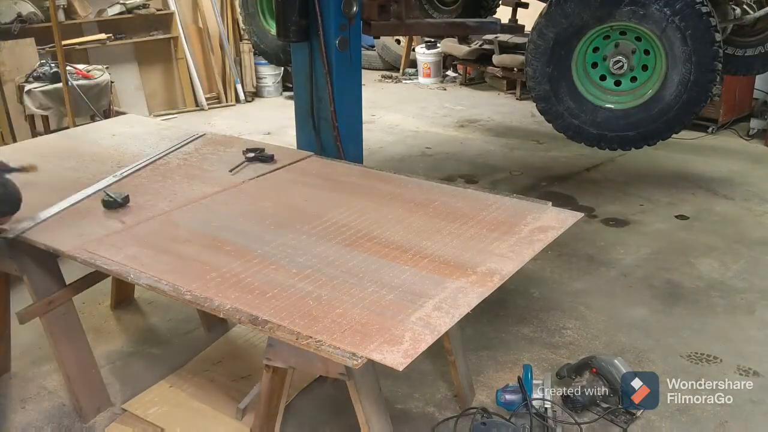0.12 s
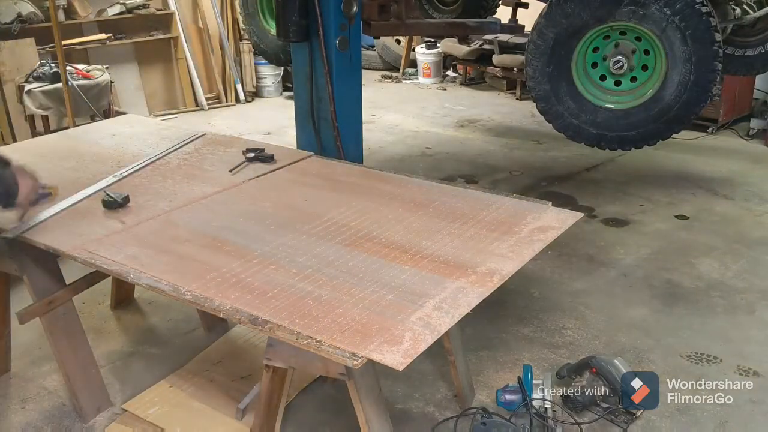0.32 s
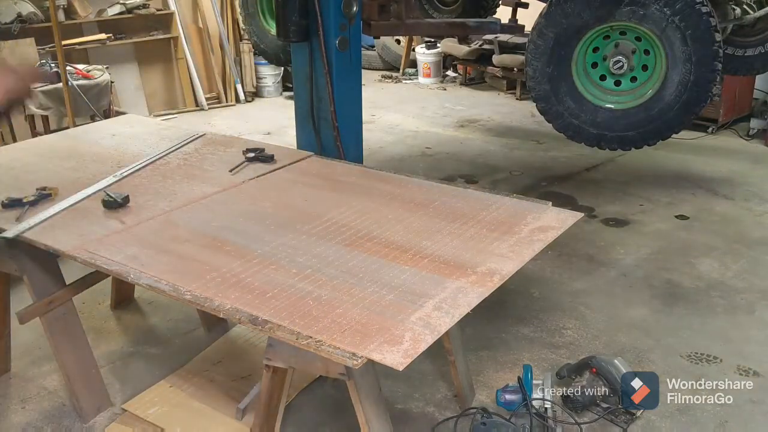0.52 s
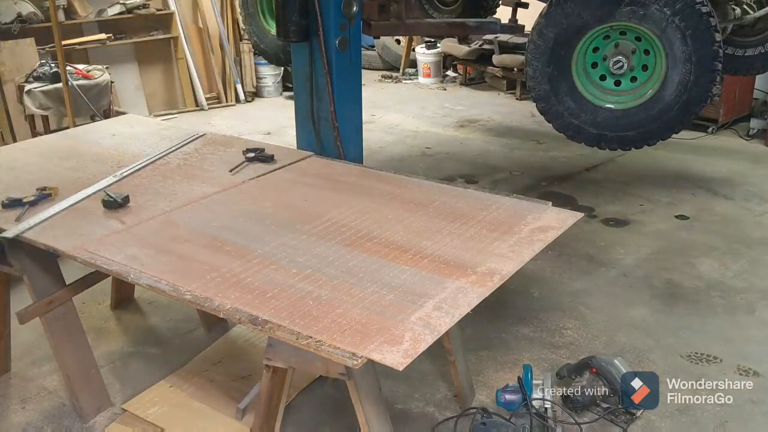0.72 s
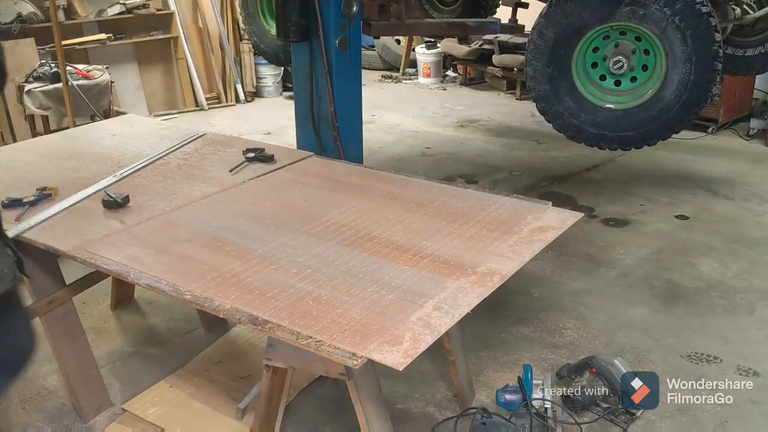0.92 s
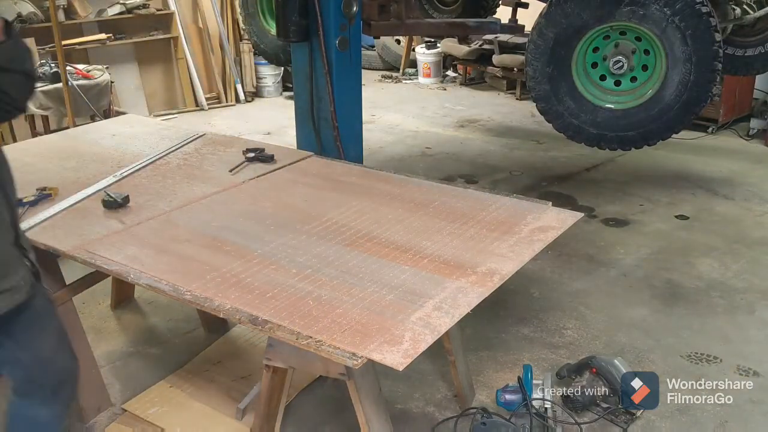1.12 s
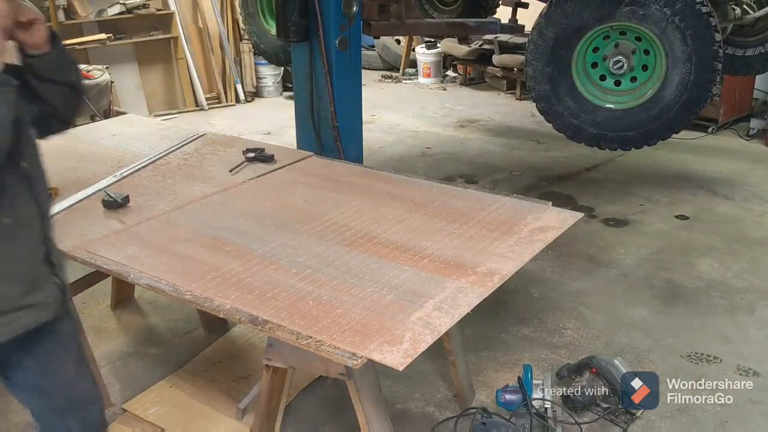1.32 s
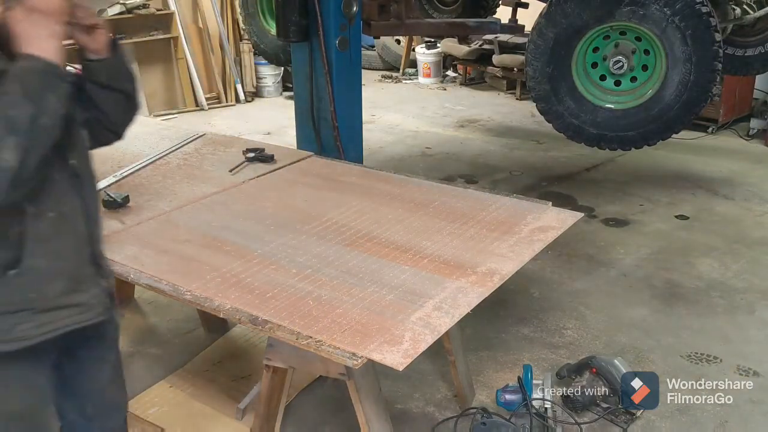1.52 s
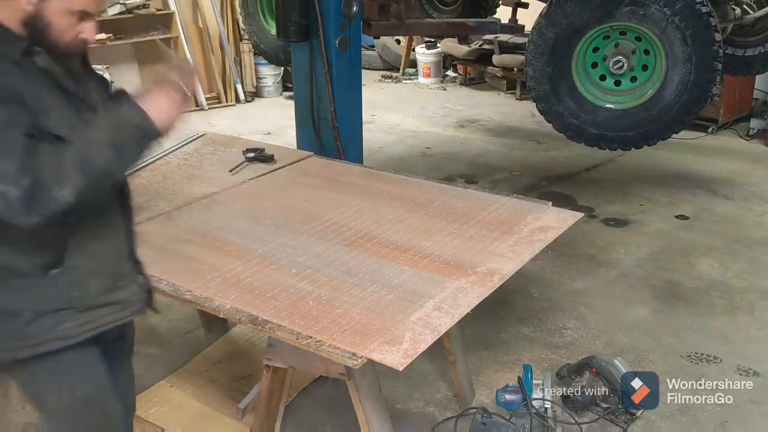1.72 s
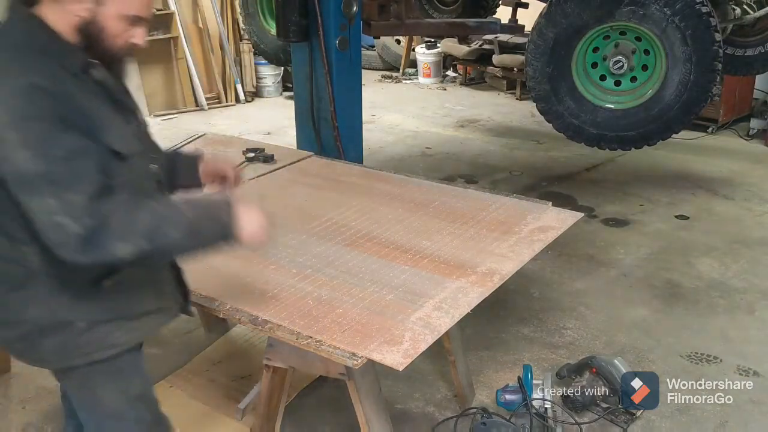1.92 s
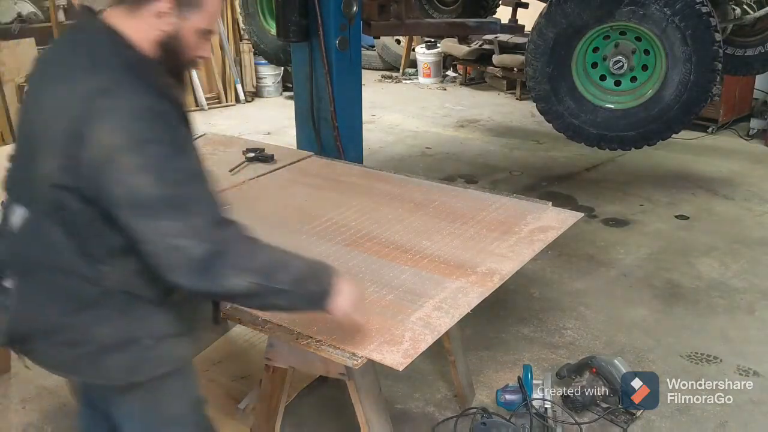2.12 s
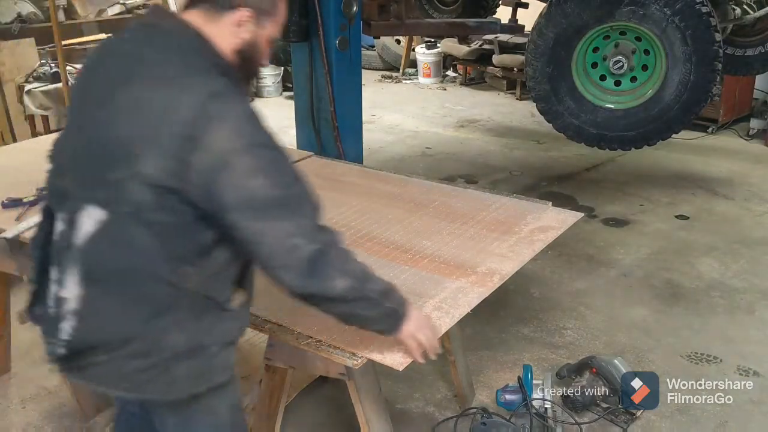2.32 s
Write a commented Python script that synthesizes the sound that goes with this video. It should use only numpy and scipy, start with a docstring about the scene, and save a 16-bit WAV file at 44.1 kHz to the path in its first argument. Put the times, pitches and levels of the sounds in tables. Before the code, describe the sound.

Tool set down on a wooden sheet, sharp loud clack as it tips, faint footsteps, light knock

```python
"""A faint swish over quiet workshop air leads to the thud of a tool put down on plywood across sawhorses.
The tool topples with a hard double clack and rocks to rest: filtered noise bursts, cracks and struck modes.
Someone steps round the sheet, jacket and soles swishing (shaped noise), with soft thumps (decaying sines).
Last, the edge of the sheet is taken hold of and knocks on a sawhorse, again noise bursts and sheet modes.
Each contact also excites the reverberant room, as diffuse noise with a decay time for each band."""
import sys
import numpy as np
from scipy import signal
from scipy.io import wavfile

SR = 44100
rng = np.random.default_rng(int(sys.argv[2]) if len(sys.argv) > 2 else 0)


def persist_wave(psi):
    """Save psi, clipped to +-1, as 16-bit WAV."""
    counts = np.round(np.clip(psi, -1, 1) * 32767).astype(np.int16)
    wavfile.write(sys.argv[1], SR, np.atleast_2d(counts).T)


N = 110250
T = np.arange(N) / SR
TAIL = T[:SR]   # time axis of one contact, one second long
BANDS = 25 * 2 ** (np.arange(29) / 3)   # third-octave centres [Hz]
EARS = np.array([[1], [-1]])   # left, right
SWELL_CYCLES = 1.3   # time constant of a mode's build-up, in its own cycles

# Reverberation time of the room: (frequency [Hz], t60 [s])
ROOM_DECAY = [(60, 0.82), (150, 0.79), (400, 0.45), (1000, 0.38), (2500, 0.48), (5500, 0.5), (8000, 0.41),
              (14000, 0.25)]
# Stereo balance of direct sound: (frequency [Hz], left minus right [dB])
DIRECT_BALANCE = [(170, 2.4), (300, -1.5), (550, 10), (1200, -1.5), (3000, 1.5), (7000, -2), (12000, 13.5)]


def from_db(db):
    """Level to amplitude: 20 dB is a factor of ten."""
    return 10 ** (np.asarray(db) / 20)


def at_hz(points, hz):
    """Linear interpolation of a table along a logarithmic frequency axis."""
    table = np.array(points)
    return np.interp(np.log(hz), np.log(table[:, 0]), table[:, 1])


def dying(t60):
    """Exponential damping: the amplitude falls by 60 dB in t60 seconds."""
    return 1000.0 ** (-TAIL / max(t60, .002))


def add(out, s, sound):
    """Superposition: mixes a sound in from time s [s] on."""
    i = max(int(s * SR), 0)
    out[:, i:i + sound.shape[-1]] += sound[..., :N - i]


def from_left(x):
    """Interaural delay: sound from the left reaches the right microphone later."""
    right_lag_s = 0.00015
    left, right = np.broadcast_to(x, (2, len(TAIL)))
    return np.array([left, np.interp(TAIL - right_lag_s, TAIL, right, left=0)])


def unevenness(length, spread_db, grain_s):
    """Stepwise random modulation: each grain holds one level drawn around 0 dB."""
    levels = from_db(spread_db * np.clip(rng.standard_normal(length), -2, 2))
    return levels[(T[:length] / grain_s).astype(int)]


def band_noise(k, envelope, direct=0):
    """Partial coherence: a third octave of noise from a common and an opposed part, direct sound more alike."""
    # Likeness of diffuse sound at the two ears: (frequency [Hz], likeness [0 to 1])
    ear_likeness = [(160, .997), (290, .9), (500, .74), (1000, .64), (2000, .15), (5000, .1), (14000, .05)]
    # Stereo balance of diffuse sound: (frequency [Hz], left minus right [dB])
    diffuse_balance = [(200, .2), (600, 2.9), (3000, 0.72), (7000, 1.5), (12000, 8.2)]
    hz = BANDS[k]
    edges = [hz / 2 ** (1 / 6), hz * 2 ** (1 / 6)]
    sos = signal.butter(2, edges, "band", fs=SR, output="sos")
    noise = signal.sosfilt(sos, rng.standard_normal((2, len(envelope))) * envelope + 1e-18)
    # the filtered noise regains the energy of the envelope
    energy_ratio = np.sum(envelope ** 2) / np.sum(noise ** 2, axis=1, keepdims=True)
    common, opposed = noise * np.sqrt(energy_ratio)
    alike = np.clip(direct + (1 - direct) * at_hz(ear_likeness, hz), 0, .999)
    stereo = np.sqrt((1 + alike) / 2) * common + np.sqrt((1 - alike) / 2) * opposed * EARS
    balance_db = at_hz(DIRECT_BALANCE if direct else diffuse_balance, hz)
    return stereo * from_db(EARS * balance_db / 2)


def blow(band_db, t60, room_db):
    """Impact in a reverberant room: a grainy damped direct burst, then a diffuse field that builds and decays."""
    room_build_s, direct_likeness = 0.018, 0.11
    room_bass_hz = 260   # below this the sheet's own modes outweigh the room
    out = 0
    build = 1 - np.exp(-TAIL / room_build_s)
    early = unevenness(SR, spread_db=3, grain_s=.0004) * dying(t60)
    early = early * np.linalg.norm(dying(t60)) / np.linalg.norm(early)
    for k, hz in enumerate(BANDS):
        body = band_noise(k, early, direct_likeness)
        room = band_noise(k, build * dying(at_hz(ROOM_DECAY, hz)))
        room = room / np.hypot(1, room_bass_hz / hz)
        out = out + from_db(band_db[k]) * (body + from_db(room_db) * room)
    return out


def ring(modes, weight_db, spread=0, cycles=0):
    """Modal superposition: damped sines, neighbours in opposite sign; spread [radians] parts the ears' phases."""
    out = 0
    for k, (hz, db, t60) in enumerate(modes):
        strength_db = db + weight_db(hz) + rng.uniform(-1.6, 1)
        gain = np.cos(np.pi * k) * from_db(strength_db + EARS * at_hz(DIRECT_BALANCE, hz) / 2)
        swell = 1 - np.exp(-TAIL * hz / cycles) if cycles else 1
        phase = EARS * spread * rng.uniform(-0.89, 1)
        out = out + gain * swell * dying(t60) * np.sin(2 * np.pi * hz * TAIL + phase)
    return out


def workshop_air():
    """Stationary noise: steady rumble and hiss shaped by third octaves, with a faint sinusoidal mains hum."""
    # Spectrum of the room's background: (frequency [Hz], level per third octave [dB])
    air_spectrum = [(25, -58.5), (35, -67), (50, -66), (75, -64.5), (100, -73), (200, -72), (400, -70.5),
                    (1000, -72), (2000, -73.5), (4000, -69.5), (6000, -73.5), (10000, -73), (15000, -75.5)]
    hum_hz, hum_db = 120, -62.5
    air = sum(from_db(at_hz(air_spectrum, hz)) * band_noise(k, np.ones(N)) for k, hz in enumerate(BANDS))
    return air + from_db(hum_db) * np.sin(2 * np.pi * hum_hz * T)


def swishes():
    """Friction noise: rubbing swells, snags and dies with the room; a narrow resonance is the weave's rasp."""
    # Strokes of cloth and soles: (start [s], rise [s], hold [s], level [dB],
    # treble tilt [dB per octave], pitch of the rasp [Hz])
    strokes = [(0.0, 0.0025, 0.092, -64.5, -2.5, 5700), (0.092, 0.085, 0.022, -54, -2, 5870),
               (1.468, 0.0067, 0.039, -58, 1, 6000), (1.628, 0.11, 0.078, -62, -1, 4160),
               (1.846, 0.039, 0.111, -72.5, -3.5, 5700), (2.092, 0.029, 0.072, -55, 4, 5960),
               (2.427, 0.029, .03, -60.5, -6, 5840)]
    # Spectrum of the rubbing: (frequency [Hz], level per third octave [dB])
    cloth_spectrum = [(100, -8), (300, -12.5), (900, -8), (2000, -13), (4000, -1), (6000, -8), (9000, -1),
                      (15000, -9.5)]
    rasp_db, rasp_width_hz = -4, 500
    snags = unevenness(N, spread_db=1.5, grain_s=0.0033)
    snags = snags / np.sqrt(np.mean(snags ** 2))

    def stroke(hz, s, rise, hold, db, tilt_db):
        """Envelope of one stroke: linear attack, snagging hold, reverberant decay."""
        end = s + rise + hold
        fade_db = -60 * np.maximum(T - end, 0) / at_hz(ROOM_DECAY, hz)
        attack = np.clip((T - s) / max(rise, .003), 0, 1)   # at least 3 ms long
        rubbing = attack * np.where(T < end, snags, 1)
        return rubbing * from_db(db + fade_db + tilt_db * np.log2(max(hz, 1000) / 5000))

    out = 0
    for k, hz in enumerate(BANDS):
        power = sum(stroke(hz, *shape) ** 2 for *shape, rasp_hz in strokes)
        out = out + from_db(at_hz(cloth_spectrum, hz)) * band_noise(k, np.sqrt(power))
    for *shape, rasp_hz in strokes:
        peak = signal.iirpeak(rasp_hz, rasp_hz / rasp_width_hz, fs=SR)
        rasp = signal.lfilter(*peak, rng.standard_normal((2, N)))
        out = out + from_db(rasp_db) * stroke(rasp_hz, *shape) * rasp / rasp.std()
    return out


def footsteps():
    """Soft impact of soles on concrete: a damped oscillation thumps inside a dull noise scuff."""
    # Footfalls: (time [s], level [dB], pitch of the thump [Hz], t60 of the thump [s],
    # thump over scuff [dB], centre of the scuff [Hz], room [dB])
    footfalls = [(1.4693, -49, 224, 0.034, 12, 376, -29), (2.105, -48.5, 314, 0.08, 11.5, 640, -3),
                 (2.135, -51, 296, 0.16, 8.5, 605, -7.5), (2.302, -41, 226, 0.043, 6, 610, -14)]
    scuff_slope_db, scuff_t60_s = 7, 0.018   # slope per octave either side of the centre
    out = np.zeros((2, N))
    for s, db, hz, t60, thump_db, scuff_hz, room_db in footfalls:
        scuff_spectrum_db = -scuff_slope_db * abs(np.log2(BANDS / scuff_hz))
        scuff = blow(scuff_spectrum_db, scuff_t60_s, room_db)
        thump = from_db(thump_db) * dying(t60) * np.sin(2 * np.pi * hz * TAIL)
        add(out, s, from_db(db) * from_left(scuff + thump))
    return out


def housing():
    """Shell resonance: the tool's hollow housing knocks, a dense noise band plus damped modes, as it rocks."""
    # Knocks of the housing as the tool topples and rocks: (time [s], level [dB])
    rocks = [(0.4919, -11), (0.5305, -7), (0.669, -30), (0.735, -41.5), (0.861, -41)]
    # Modes of the housing: (frequency [Hz], level [dB], t60 [s])
    shell_modes = [(815, -12, 0.056), (910, -1.5, 0.067), (1047, -18, 0.059), (1236, -13, 0.21),
                   (1335, -18, 0.049), (2515, -17, 0.14), (2790, -10.5, 0.1)]
    centre_hz, slope_db, body_db = 980, 17, -10   # dense part; slope per octave either side
    out = np.zeros((2, N))
    spectrum_db = body_db - slope_db * abs(np.log2(BANDS / centre_hz))
    body = blow(spectrum_db, t60=0.16, room_db=-12)
    for s, db in rocks:
        shell = ring(shell_modes, lambda hz: 0, cycles=SWELL_CYCLES)
        add(out, s, from_db(db) * from_left(body + shell))
    return out


def tool():
    """Hard impact: a band-limited impulse with early reflections, a bright clatter and the tool's modal ring."""
    # Hard contacts and rattles on the sheet: (time [s], level [dB], treble tilt [dB per octave],
    # room [dB], first crack [dB])
    contacts = [(0.227, -43, 1.5, 3.5, -10), (0.268, -48.5, 8, -4.5, -14), (0.4926, -32, -3.5, 0, 13),
                (0.4962, -53, 12.5, -7, 3.5), (0.5288, -29, -3, -2.5, 22.5), (0.5321, -23.5, -0.2, 2.5, 4),
                (1.3, -57, -4.5, -8, 9)]
    # Spectrum of the clatter: (frequency [Hz], level per third octave [dB])
    hard_spectrum = [(100, -45.5), (300, -10.5), (600, -17.5), (900, -6), (1800, -6.5), (2600, 2.5),
                     (4000, 3), (5500, -3.5), (7500, -2), (10000, -6), (15000, -16)]
    # Reflections from near surfaces: (delay [s], level [dB])
    near_echoes = [(.0033, -3.5), (.0062, -11), (0.012, -1), (0.018, -11), (0.0235, 3)]
    # Modes of the tool: (frequency [Hz])
    tool_pitches = [1405, 2285, 2421, 2552, 2695, 2865, 2992, 3381, 3834, 4021, 4395, 4807, 5394, 5749]
    # Strengths of the same modes: (level [dB])
    tool_levels = [-14, -13, -12, -12, -10, -12, -10, -12, -12, -13, -12, -12, -15, -15]
    clatter_t60_s, ring_t60_s = 0.11, 0.55
    ring_over_room_db = -1.5   # the ring follows the room level of each contact
    out = np.zeros((2, N))
    crack_band = signal.butter(2, [645, 2850], "band", fs=SR, output="sos")   # Hz
    impulse = (TAIL == 0) + 1e-18
    crack = from_db(16) * signal.sosfilt(crack_band, impulse)
    modes = [(hz, db, ring_t60_s) for hz, db in zip(tool_pitches, tool_levels)]
    for s, db, tilt_db, room_db, crack_db in contacts:
        def colour_db(hz):
            """Spectral tilt about 3 kHz, level below 500 Hz."""
            return tilt_db * np.log2(np.maximum(hz, 500) / 3000)

        clatter = blow(at_hz(hard_spectrum, BANDS) + colour_db(BANDS), clatter_t60_s, room_db)
        ringing = from_db(room_db + ring_over_room_db) * ring(modes, colour_db, spread=1.0)
        add(out, s, from_db(db) * from_left(clatter + ringing))
        for delay, echo_db in [(0.0019, 0)] + near_echoes:   # the crack itself, then its echoes
            add(out, s + delay, from_db(db + crack_db + echo_db) * from_left(crack))
    return out


def sheet():
    """Plate vibration: place and softness of each contact set how much bass and treble the plywood holds."""
    # Dull blows on the sheet: (time [s], level [dB], bass cut [Hz], treble cut [Hz],
    # t60 of the body [s], room [dB], ring of the modes [dB])
    blows = [(0.2254, -19.5, 120, 1490, 0.066, -8, 2), (0.2436, -24, 240, 1020, 0.098, -8, -3.5),
             (0.2865, -28.5, 300, 1400, 0.031, -9.5, -4.5), (0.492, -30, 328, 1715, 0.11, -5.5, -1),
             (0.5293, -20, 560, 2120, 0.06, -8.5, -4), (0.5315, -30, 101.2, 190, 0.088, -0.5, 10.5),
             (0.672, -30, 646, 860, 0.032, -20, -6), (0.737, -40, 510, 1290, 0.077, -9, -13),
             (2.4443, -33.5, 555, 3590, 0.12, -0.5, -8), (2.4795, -36.5, 360, 3620, 0.047, -11, 1.5),
             (2.4843, -35, 700, 4200, 0.065, 7, -6)]
    # Spectrum of a blow on wood: (frequency [Hz], level per third octave [dB])
    wood_spectrum = [(30, -25), (55, -32), (75, -31), (97, -4), (125, -6.5), (200, -6), (330, -3),
                     (520, -2.5), (700, -7.5), (950, 1), (1550, -1), (2100, -12), (4000, -17), (8000, -26),
                     (15000, -17.5)]
    # Modes of the sheet: (frequency [Hz])
    sheet_pitches = [70, 119, 140, 182, 217, 262, 306, 361, 479, 543, 659, 827, 909, 996, 1062, 1152, 1241]
    # Strength and damping of the same modes: (level [dB], t60 [s])
    sheet_damping = [(-11, 0.78), (2.5, 0.36), (4, 0.29), (-7, 0.5), (-10.5, 0.37), (-3, 0.33), (-2, 0.44),
                     (-4.5, 0.17), (-18, 0.92), (-7.5, 0.22), (0, 0.11), (-6, 0.35), (-16, 0.39),
                     (-13, 0.4), (-22.5, 0.22), (-21, 0.28), (-13, 0.23)]
    out = np.zeros((2, N))
    modes = [(hz, db, t60) for hz, (db, t60) in zip(sheet_pitches, sheet_damping)]
    for s, db, low_hz, high_hz, t60, room_db, ring_db in blows:
        def contact_db(hz):
            """Contact filter: roll-off below the bass cut and above the treble cut."""
            return -10 * np.log10((1 + (low_hz / hz) ** 3) * (1 + (hz / high_hz) ** 4))

        thud = blow(at_hz(wood_spectrum, BANDS) + contact_db(BANDS), t60, room_db)
        ringing = from_db(ring_db) * ring(modes, contact_db, cycles=SWELL_CYCLES)
        add(out, s, from_db(db) * from_left(thud + ringing))
    return out


def scene():
    """Linear superposition of all sources."""
    return workshop_air() + swishes() + footsteps() + housing() + tool() + sheet()


def record(dry):
    """Transducer response: resonances colour the treble, loud peaks clip, the end fades, a low-pass cuts the top."""
    # Resonances of the microphones: (frequency [Hz], width [Hz], added gain [factor])
    mic_resonances = [(3960, 100, 0.14), (5690, 400, 1.4), (7370, 450, 0.79), (9620, 540, 0.63),
                      (11860, 430, 1)]
    cutoff_hz, fade_s = 15850, .002
    coloured = dry
    for hz, width, gain in mic_resonances:
        peak = signal.iirpeak(hz, hz / width, fs=SR)
        coloured = coloured + gain * signal.lfilter(*peak, dry)
    fade = np.minimum((T[-1] - T) / fade_s, 1)
    clipped = np.clip(coloured, -.93, .93) * fade
    top_cut = signal.ellip(10, .2, 70, cutoff_hz, fs=SR, output="sos")
    return signal.sosfilt(top_cut, clipped)


dry = scene()
out = record(dry)
persist_wave(out)
```